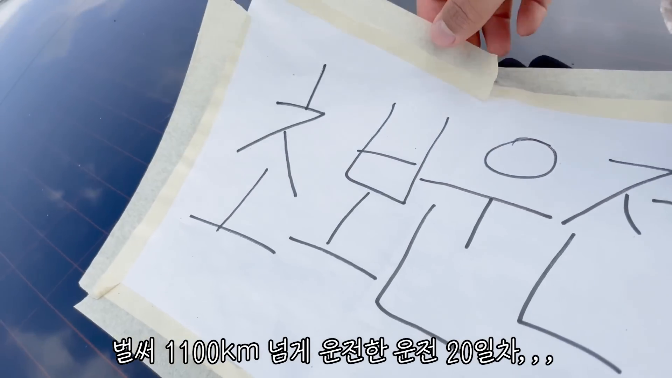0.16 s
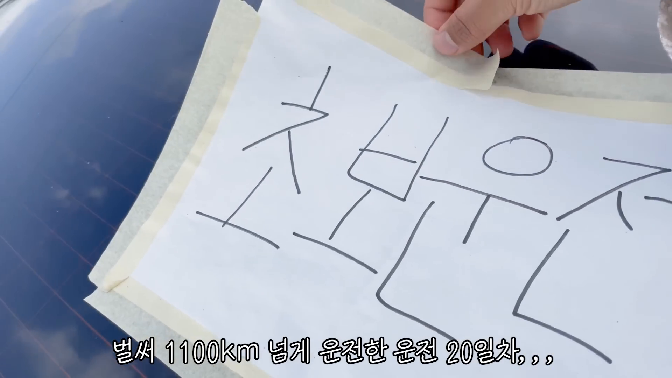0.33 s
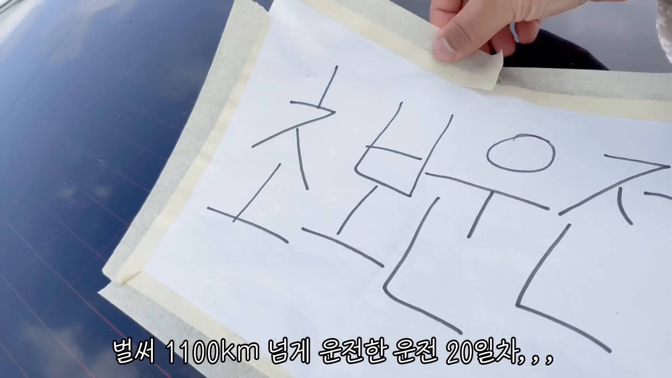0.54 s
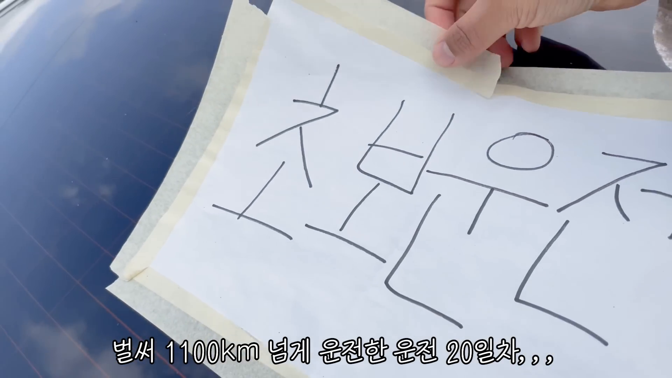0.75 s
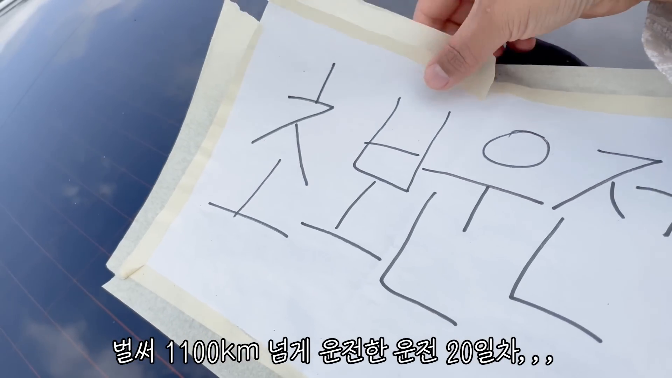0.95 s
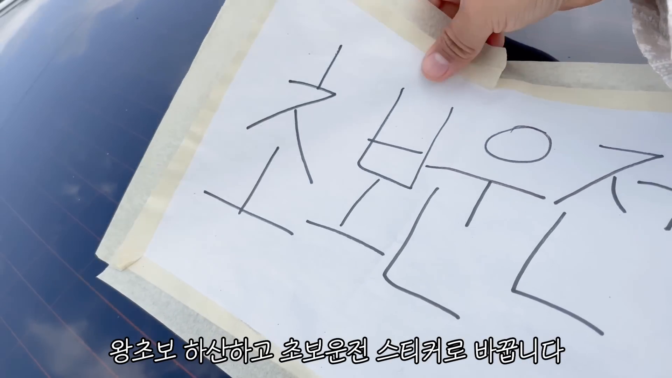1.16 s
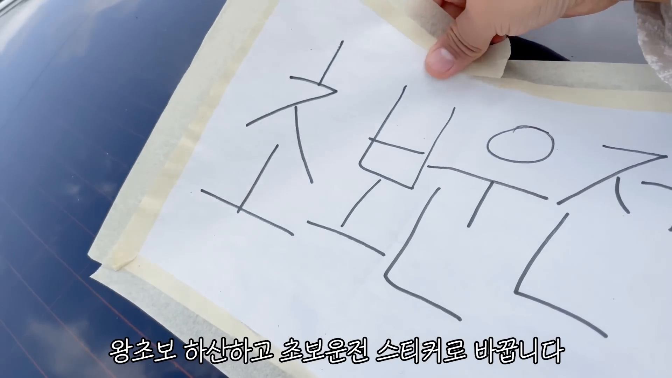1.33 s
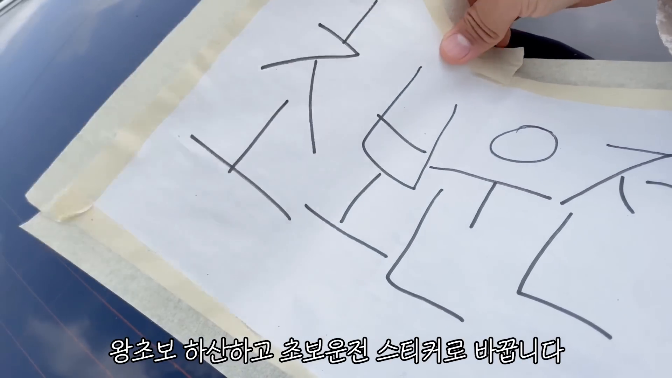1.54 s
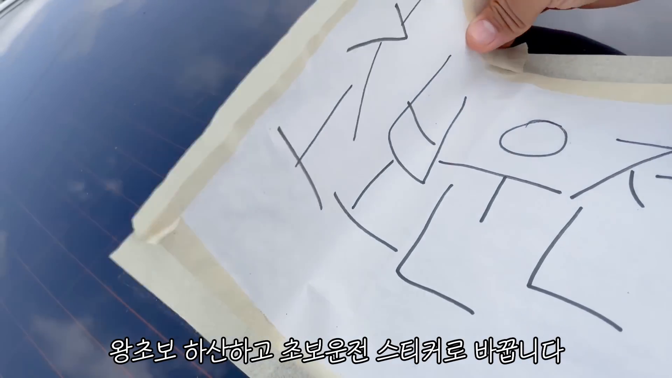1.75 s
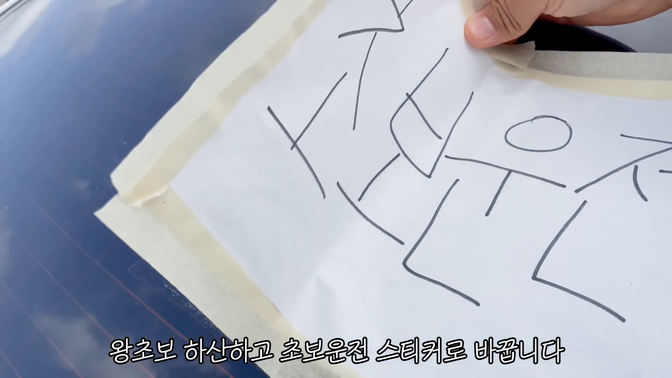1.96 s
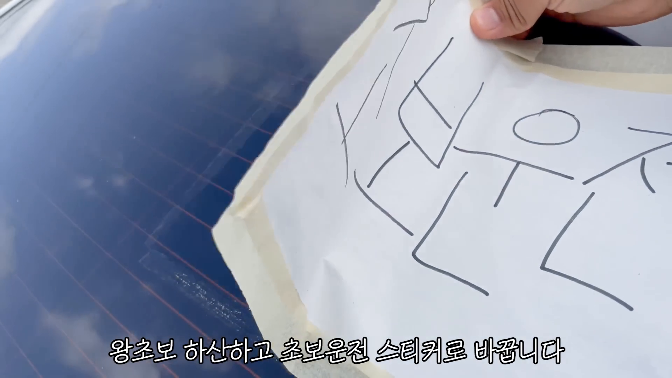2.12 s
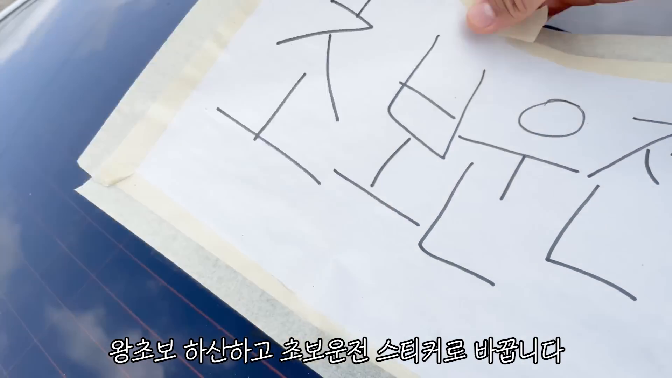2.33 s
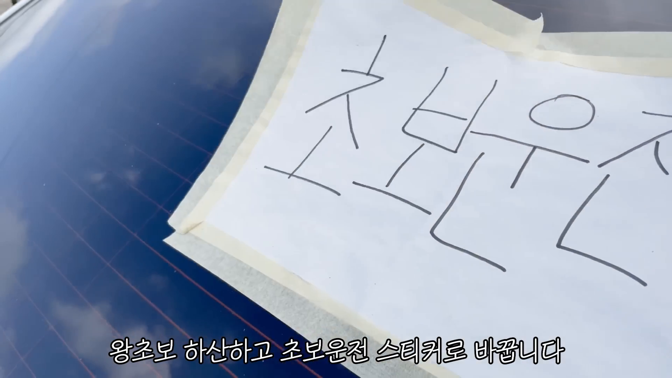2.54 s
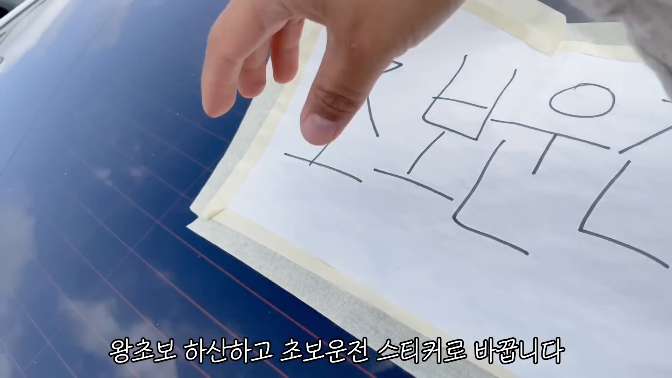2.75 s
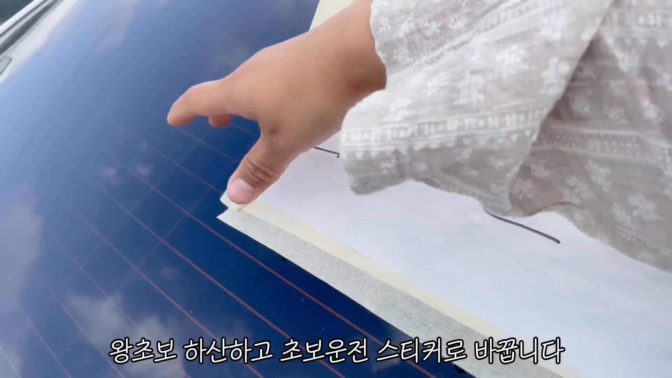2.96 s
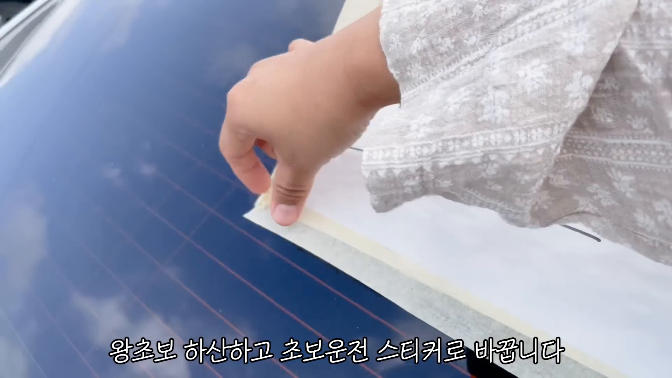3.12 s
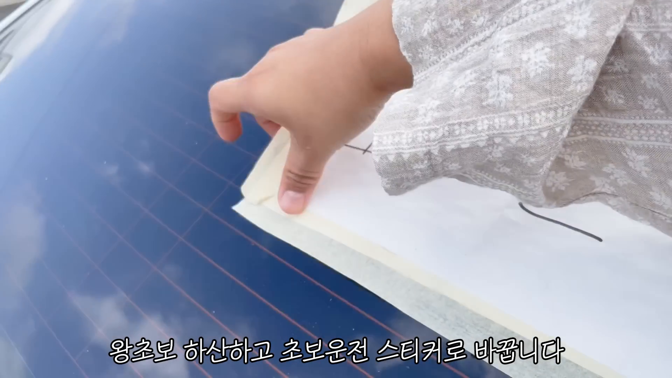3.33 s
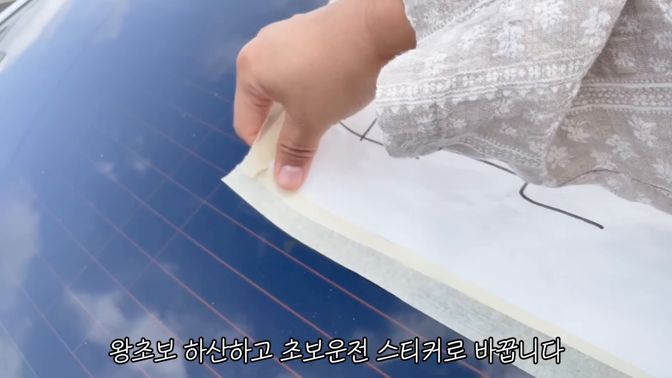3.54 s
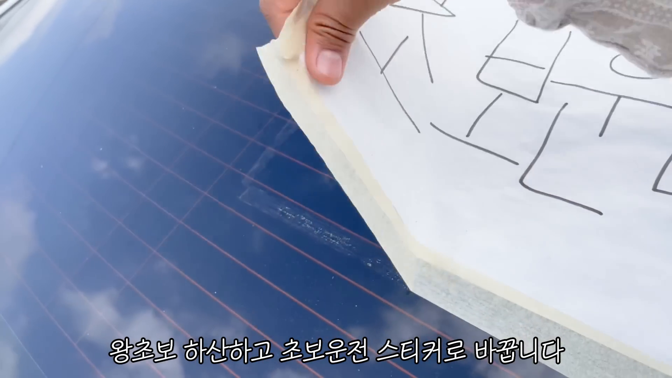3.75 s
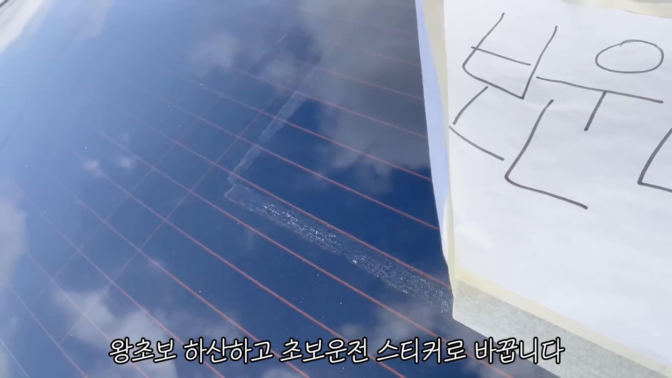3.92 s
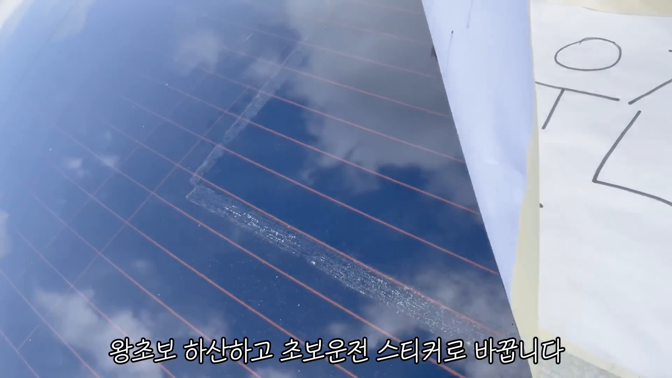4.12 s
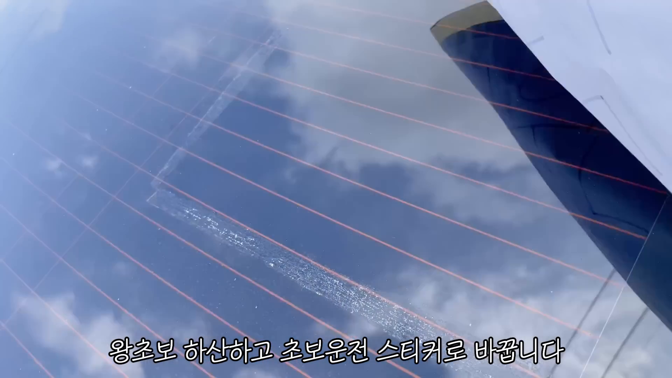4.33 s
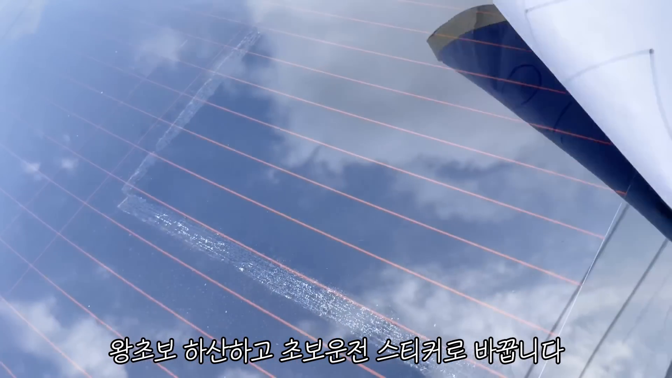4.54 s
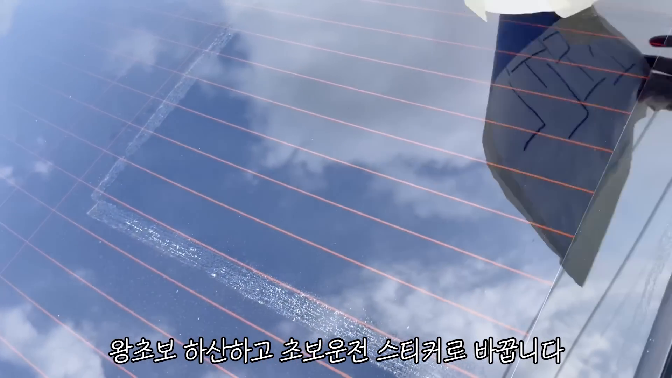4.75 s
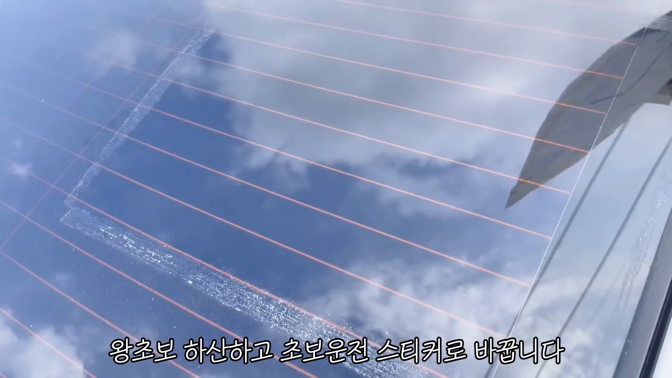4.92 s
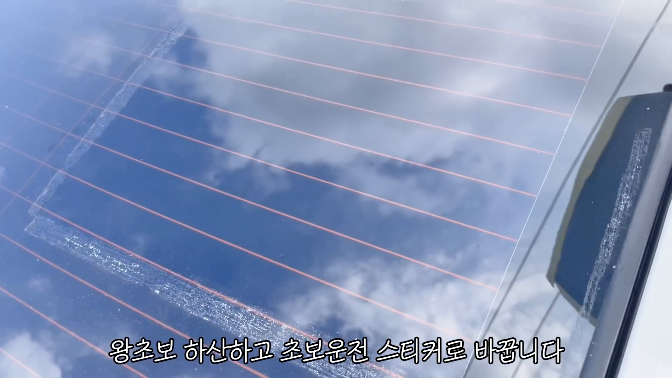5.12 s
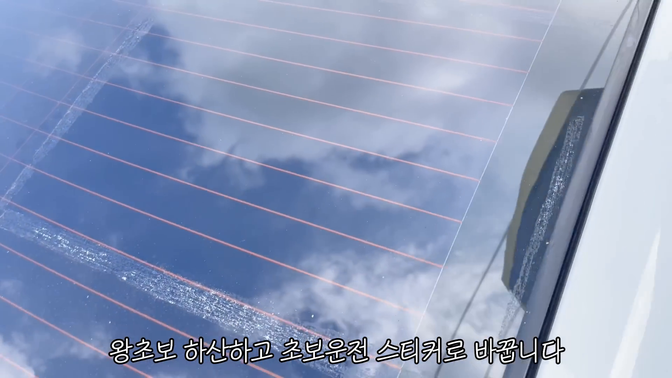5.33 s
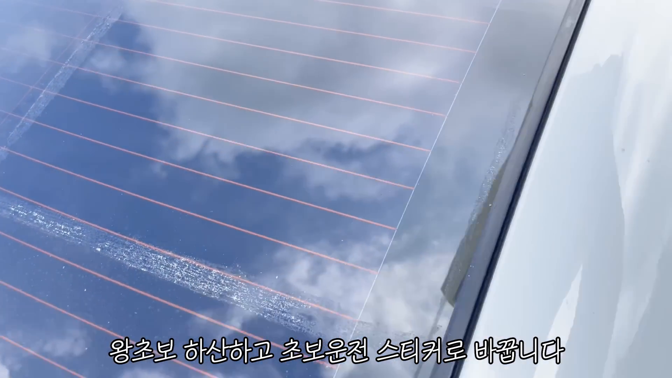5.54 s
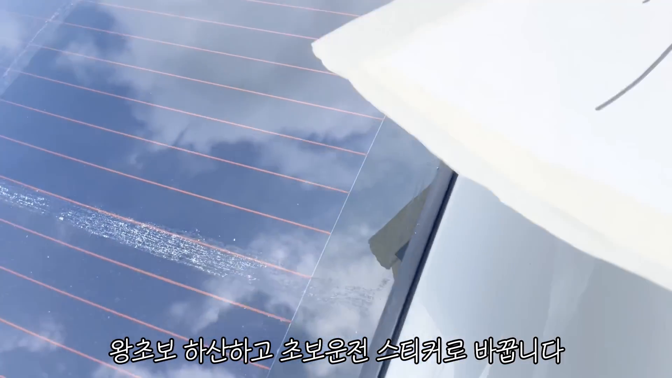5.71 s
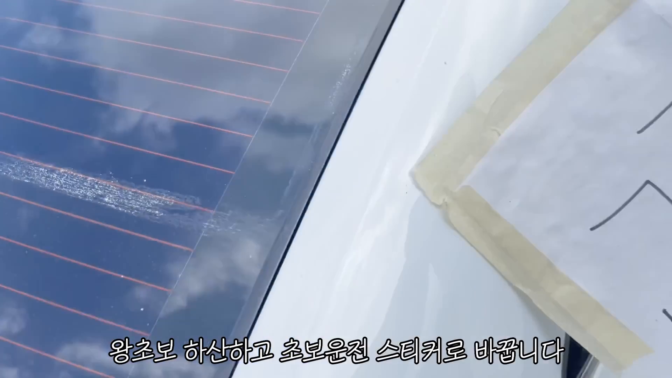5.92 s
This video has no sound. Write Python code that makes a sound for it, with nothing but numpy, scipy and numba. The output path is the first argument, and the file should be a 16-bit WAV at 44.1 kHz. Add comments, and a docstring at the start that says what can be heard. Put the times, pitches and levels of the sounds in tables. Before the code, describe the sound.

Close, dry stereo phone pickup outdoors, with a soft low rush of air. From 0.1 to 0.6 s a fingertip hisses faintly and evenly along paper tape. Around 1.1 s a thin, distant bird-like whistle sounds very faintly, dropping at its end, as the first small paper crackles begin. Between 1.3 and 2.5 s the stiff sheet bends with scattered sharp snaps, two short rips near 1.4 s and a tight cluster at 2.15 s, amid low buffeting. A deep soft flap thumps at 2.7 s. From 3.05 s peeling resumes, thickening after 3.4 s into gritty ticks; brighter, fizzy glue crackle fills 4.0 to 4.25 s, then hard cracks and rips peak around 4.5 s, with another strong snap at 4.93 s. The freed sheet makes a soft wide swish from 5 to 5.75 s with light flaps, ending in a brief crackle and snap near 6 s.

```python
"""A fingertip hisses along masking tape over the low rush of the open air; then a paper sign is pulled
off a car's rear window, close to a phone. The glue lets go in showers of ticks and short rips (noise bursts),
and the stiff sheet buckles with sharp snaps (noise cracks that ring on). Its flapping pushes soft thumps
of air at the microphone (short low tones). A swish, a rustle and a faint whistle complete the scene."""
import sys
import numpy as np
from scipy import signal
from scipy.fft import rfft, irfft, next_fast_len
from scipy.io import wavfile
from scipy.ndimage import uniform_filter1d, map_coordinates
from numba import njit

SR = 44100
rng = np.random.default_rng(int(sys.argv[2]) if len(sys.argv) > 2 else 0)


def generate_wav(sig):
    """Save sig (samples, or channels by samples) to the path in sys.argv[1] as 16-bit PCM at SR."""
    pcm = np.round(np.clip(np.atleast_2d(sig).T, -1, 1) * 32767).astype(np.int16)
    wavfile.write(sys.argv[1], SR, pcm)


N = 267819
T = np.arange(N) / SR  # time of every sample, in seconds

# The bright fizz of the paper's fibres. Each row: pitch in Hz, level in dB.
FIBRE_FIZZ = [(3000, -51), (8500, -7.5), (10000, 7), (11500, 11), (12800, 15), (14200, 5), (15800, -2),
              (17500, -41)]


def snaps(ring=0.45, ring_hz=2600, tail_s=0.01, tail=0.036, length_s=0.0022, lead_in_s=0.0032, size=3000):
    """A crease flips over or a glue thread breaks: a crack, its bounce, a low-pitched ring and a scattered tail."""
    # Sharp single snaps: the sheet buckles or, around 4.03 to 4.25 s, a glue thread breaks.
    # Each row: time in seconds, crack level in dB, body minus crack in dB, fizz minus crack in dB.
    snap_list = [(1.147, -33, -2.5, -14), (1.370, -23.5, 3.5, 8), (1.553, -34, 6, 3.5),
                 (1.6835, -21, 0.5, 3.5), (1.756, -35.5, 4.5, 10), (1.7646, -30, -7, 2),
                 (1.777, -28, -6.5, -8), (1.912, -34, 2, 6), (2.0256, -40, -16, 8.5),
                 (2.081, -45, 15.5, -12), (2.1536, -28.5, 9, 10), (2.1563, -22.5, 1.5, 4.5),
                 (2.1608, -20.5, -2.5, 0), (2.1709, -29, -2, 9), (2.2733, -31, 11, -14),
                 (2.288, -31.5, 1, -25), (2.3215, -21, 4.5, -13.5), (2.3295, -28, -3, -14),
                 (2.356, -40, 12, -28), (2.4092, -45, 18.5, -10), (2.4835, -27, 3.5, -10),
                 (3.078, -24.5, -3.5, -10), (3.1661, -27, -4.5, -6), (3.2969, -45.5, 19, -1),
                 (3.3133, -42, 15, -8), (3.447, -33, -0.5, -15), (3.4561, -20, 3, -7),
                 (3.4805, -32, 11, -25), (3.6565, -27, -1, -8), (3.6857, -27.5, -5, -22),
                 (3.743, -21.5, -8, -21), (3.7821, -18.5, -5, -11), (3.826, -28, -13, -1),
                 (3.8576, -26.5, 3, -6.5), (3.94, -29, -2, -6.5), (4.027, -30.5, -9, -8),
                 (4.043, -25.5, -22, -9), (4.0618, -31.5, -27, -7), (4.091, -32, -19, 4.5),
                 (4.098, -30.5, -14, 5), (4.1088, -31.5, -14, 3), (4.132, -32, -3, 0),
                 (4.1668, -27, -21, -1), (4.178, -25, -15, -1.5), (4.2066, -27, -7, 9),
                 (4.225, -40.5, -9, 13), (4.252, -28, -15, -5), (4.281, -30, 8, -28),
                 (4.3125, -36.5, -6, -20), (4.365, -27.5, -18, -20), (4.407, -40, -4, -16),
                 (4.4191, -24, -7.5, -10), (4.451, -27, -13, -11), (4.4947, -14, -4.5, -11),
                 (4.535, -32, -5, -21), (4.555, -24.5, -23, -12.5), (4.5954, -19.5, -11, -4.5),
                 (4.6271, -20, -5, -9), (4.701, -46, 13, -13), (4.727, -47.5, 13.5, -24),
                 (4.885, -30, -1.5, -3), (4.911, -37, -4, 10), (4.9307, -17, -1.5, -1),
                 (4.9762, -39, -1, -24), (5.0823, -42, -1, -1), (5.207, -43, 3, -22),
                 (5.326, -45.5, 6.5, -13), (5.423, -38, 3.5, -30), (5.5874, -43.5, 6, -28),
                 (5.8241, -37.5, 11, -18), (5.927, -36, 9, -22), (5.9934, -21.5, 3, -25)]
    lead_in = 0.055  # faint noise around the onset, against the crack
    rise_s, crack_s, ring_s = 0.00015, 0.0008, 0.003  # rise and fall of the crack, fading of the ring
    bounce = 0.25  # strength of the bounce off the glass, against the crack
    out = np.zeros((2, N))
    t = (np.arange(size) - size // 8) / SR  # zero at the snap
    damping = signal.butter(2, min(ring_hz, SR / 3), fs=SR)
    lags_s = rng.uniform(0.0025, 0.0029, len(snap_list))
    for (s, db, body_db, fizz_db), lag_s in zip(snap_list, lags_s):
        noise = rng.standard_normal((3, 2, size))
        crack = np.zeros(size)
        for share, since in [(1, t), (bounce, t - lag_s)]:
            crack += share * np.exp(-np.maximum(-since / rise_s, since / crack_s))
        ring_noise = ring * np.exp(-t / ring_s) * (t > 0) * noise[1]
        ringing = signal.lfilter(*damping, ring_noise)
        before = lead_in * np.exp(-np.abs(t) / lead_in_s)
        after = tail * np.exp(-t / tail_s)
        scatter = np.where(t > 0, after, before) * noise[2]
        push = crack * noise[0] + ringing + scatter
        add(out, s + t[0], sheet(push, length_s, db, body_db, fizz_db))
    return out


def rips(attack_s=0.0046, release_s=0.0063, size=4000):
    """A dense run of ticks that builds quickly and dies away quickly."""
    # A short burst of dense ticks: tape giving way or, in the first row, the fingertip touching down.
    # Each row: start in seconds, length in seconds, crack level in dB, body minus crack in dB,
    # fizz minus crack in dB.
    rip_list = [(0.061, 0.059, -55.5, 5, 6), (0.54, 0.024, -56.5, 4, 3), (1.007, 0.0055, -61.5, -4, 18),
                (1.162, 0.0062, -48.5, 17, -5), (1.302, 0.0092, -64, -7, 19.5),
                (1.373, 0.023, -27.5, 3.5, -3.5), (1.407, 0.023, -28, 2.5, -3.5),
                (2.14, 0.012, -49, 5, 5.5), (2.25, 0.01, -38.5, 9.5, -14), (3.062, 0.017, -44, 9.5, 6),
                (3.096, 0.02, -35.5, 1.5, -5), (4.263, 0.0083, -17.5, -8.5, -13),
                (4.4714, 0.011, -22.5, -3.5, -15.5), (5.863, 0.045, -42.5, 7, -12),
                (5.905, 0.017, -32.5, 7, -21)]
    out = np.zeros((2, N))
    t = np.arange(size) / SR
    for s, length_s, db, body_db, fizz_db in rip_list:
        release = np.exp(-np.maximum(t - length_s, 0) / release_s)
        envelope = np.minimum(t / attack_s, 1) * release
        grain = ticks(size, rate=900, spread_db=2, decay_s=0.0007, hiss=0.4)
        add(out, s, sheet(envelope * grain, length_s, db, body_db, fizz_db))
    return out


def peel():
    """Each pull takes hold, swells as the tape tightens and lets go; fine fibres tick between coarser glue threads."""
    # The hand pulls and the tape peels. Each row: start in seconds, length in seconds,
    # crack level in dB, fizz minus crack in dB.
    pull_list = [(0.742, 0.087, -62, -3.5), (1.201, 0.037, -66.5, 8), (1.622, 0.025, -47, -2),
                 (2.168, 0.13, -47.5, -8), (2.325, 0.092, -53.5, -15), (3.038, 0.081, -48, -7),
                 (3.136, 0.027, -43, -6), (3.276, 0.052, -45.5, -10.5), (3.388, 0.13, -48, -12),
                 (3.79, 0.13, -43, -2.5), (3.933, 0.11, -48.5, -5.5), (4.033, 0.15, -41, -2.5),
                 (4.148, .1, -39, -5), (4.299, 0.17, -51, -14.5), (4.487, 0.077, -36.5, -10.5),
                 (4.578, 0.075, -40.5, -10), (4.738, 0.029, -47.5, -2), (4.811, 0.053, -44, 0.5),
                 (4.858, 0.11, -36.5, -7), (5.796, 0.045, -42, -7), (5.846, 0.163, -53.5, -15)]
    attack_s, swell_db, release_s = 0.01, 3.5, 0.012
    # the fizzier a pull, the less it sounds the sheet's body
    plain_body_db, body_lost_per_fizz = -3.5, 0.91  # dB without fizz, dB lost per dB of fizz
    tearing, fibre_tearing = 0.78, 0.84  # shares that are breaking threads, the rest being rubbing
    fibre_db = -0.5  # finest fibres, which snap on their own, against the fizz
    out = np.zeros((2, N))
    t = T[:SR // 5]
    for s, length_s, db, fizz_db in pull_list:
        swell = undb(swell_db * (np.minimum(t / length_s, 1) - 1))
        release = np.exp(-np.maximum(t - length_s, 0) / release_s)
        envelope = np.minimum(t / attack_s, 1) * swell * release
        body_db = plain_body_db - body_lost_per_fizz * fizz_db
        threads = registers(rub(len(t), tearing), body_db, fizz_db)
        fibres = undb(fizz_db + fibre_db) * colour(rub(len(t), fibre_tearing), FIBRE_FIZZ)
        add(out, s, undb(db) * envelope * (threads + fibres))
    return out


def flaps(flutter=0.38, flutter_s=0.026, size=6000):
    """The loose sheet swings once hard and flutters unevenly around the same pitch."""
    # The sheet flaps, knocks on the glass, or the hand lands on it.
    # Each row: time of the middle in seconds, level of the swing in dB, pitch in Hz.
    flap_list = [(1.32, -25, 98), (1.397, -18, 214), (2.64, -16, 104), (2.681, -11.5, 77.6),
                 (2.72, -16, 105), (3.052, -19.5, 95.5), (3.317, -17.5, 194), (3.99, -24.5, 125),
                 (4.106, -23, 207), (4.171, -25, 236), (4.2, -22, 414), (4.205, -24.5, 157),
                 (4.797, -27.5, 182), (5.012, -31, 312), (5.19, -23.5, 363), (5.443, -29, 270),
                 (5.5, -22, 100)]
    ring_cycles, ring_s = 0.42, 0.0028  # a flap rings for a share of its period plus a fixed time
    out = np.zeros((2, N))
    t = (np.arange(size) - size // 2) / SR
    turns = rng.random((len(flap_list), 2, 1))  # where in its cycle each channel is
    for (s, db, hz), turn in zip(flap_list, turns):
        swing = np.sin(2 * np.pi * (hz * t + turn)) / np.cosh(t / (ring_cycles / hz + ring_s))
        bending = signal.butter(4, [hz / 2, hz + 140], "bandpass", fs=SR, output="sos")
        shiver = unit(signal.sosfilt(bending, rng.standard_normal((2, size))))
        shiver = shiver * np.hanning(size) / np.cosh(t / flutter_s)
        add(out, s + t[0], undb(db) * (swing + flutter * shiver))
    return out


def slide():
    """Skin on crepe paper: a fine, even hiss that reaches the right port late."""
    # A fingertip slides along the tape. Each row: time in seconds, level in dB.
    slide_level = [(.06, -59.5), (.09, -49), (.42, -45.5), (.52, -58.5), (.6, -116)]
    # The hiss of the skin. Each row: pitch in Hz, level in dB.
    finger_spectrum = [(1500, 5.5), (3000, 4.5), (5200, 3), (6500, 5), (7600, -2), (10500, 2.5),
                       (13000, -8), (16000, -46)]
    lag_s = 0.0001464
    hiss = undb(curves(slide_level)[0]) * colour(rng.standard_normal(N), finger_spectrum)
    late = map_coordinates(hiss, [(T - lag_s) * SR])
    return np.array([hiss, late])


def swish(fade_s=0.029):
    """The freed sheet is swung past the phone: a soft, wide hush that meets the two ports in opposite phase."""
    # The swing: start in seconds, length in seconds, level in dB.
    sheet_swing = (4.98, 0.77, -46.5)
    # The hush. Each row: pitch in Hz, level in dB.
    swish_spectrum = [(150, 13), (400, 1), (750, 11), (1600, 1), (3000, -15), (8000, -42)]
    s, length_s, db = sheet_swing
    envelope = np.clip(np.minimum(T - s, s + length_s - T) / fade_s, 0, 1)
    hush = envelope * undb(db) * colour(rng.standard_normal(N), swish_spectrum)
    return np.array([hush, -hush])


def rustle(body_db=4, fizz_db=-3, hiss=1.35, waver_db=4.0):
    """The held sheet never lies quite still: a faint hiss with light ticks."""
    # The handled paper. Each row: time in seconds, level in dB before it wavers.
    rustle_level = [(.9, -72.5), (1, -64.5), (2.9, -67), (3.22, -57.5), (3.7, -57.5), (5.1, -66)]
    grain = ticks(N, rate=200, spread_db=6, decay_s=0.0008, hiss=hiss)
    level_db = curves(rustle_level)[0] + waver_db * walk(13.4)
    return undb(level_db) * registers(grain, body_db, fizz_db)


def whistle():
    """A thin, faint, wavering note, like a far bird's, that holds its pitch and then drops."""
    # The note: start in seconds, length in seconds, pitch in Hz, fall at the end in Hz,
    # level in dB before it wavers.
    whistle_note = (1.06, .21, 4400, 650, -65.5)
    s, length_s, hz, fall_hz, db = whistle_note
    along = np.clip((T - s) / length_s, 0, 1)  # 0 at the start, 1 at the end
    tone = np.sin(2 * np.pi * np.cumsum(hz - fall_hz * along ** 6) / SR)
    envelope = np.sqrt(np.abs(np.sin(np.pi * along)))
    return undb(db + 4 * walk(60)) * envelope * tone


def air(gust_db=2):
    """Low buffeting near the phone, the uneven drumming of the bending paper, and the open air: coloured noise."""
    # Air moved by the sheet and the arm. Each row: time in seconds, buffeting in dB,
    # drumming of the paper in dB, both before the gusts.
    moved_air = [(0.0, -46.5, -51.5), (0.91, -52, -49.5), (1.57, -42, -39), (2.03, -29, -38.5),
                 (2.43, -43, -37.5), (2.91, -32, -35.5), (3.2, -38, -37.5), (3.69, -71, -33.5),
                 (4.04, -38.5, -34), (4.29, -36, -44.5), (4.5, -40.5, -45.5), (5.06, -36.5, -38),
                 (5.43, -41, -48), (5.63, -48, -51.5), (6.07, -52.5, -56.5)]
    # The rush of the open air. Each row: time in seconds, level in dB.
    outdoor_level = [(0, -49), (2.1, -44), (4.1, -43), (5.1, -58), (6.07, -53)]
    # Colour of the buffeting. Each row: pitch in Hz, level in dB.
    buffet_spectrum = [(15, -37), (35, -5), (70, 4.5), (110, -0.5), (160, -7), (300, -58), (1000, -64)]
    # Colour of the drumming. Each row: pitch in Hz, level in dB.
    drum_spectrum = [(60, -10), (130, -5), (180, 2.5), (245, 2.5), (330, -8), (480, -16), (1400, -82)]
    # Colour of the open air. Each row: pitch in Hz, level in dB.
    rush_spectrum = [(100, 0.5), (280, 11), (560, 8.5), (850, 9), (1250, 2), (2000, -10), (8500, -38.5)]
    buffet_db, drum_db = curves(moved_air)
    layers = [(buffet_db + gust_db * walk(26), buffet_spectrum),
              (drum_db + gust_db * walk(100), drum_spectrum),
              (curves(outdoor_level)[0], rush_spectrum)]
    return sum(undb(db) * colour(rng.standard_normal((2, N)), spectrum) for db, spectrum in layers)


def sheet(push, length_s, db, body_db, fizz_db):
    """One push on one patch of paper, with the given levels over length_s."""
    spread = np.sqrt(length_s * SR / push.shape[1])
    return registers(facet(push), body_db, fizz_db) * undb(db) * spread


def registers(push, body_db, fizz_db, edge_db=-0.5, edge_share=0.79):
    """A push sounds the sheet's hollow body, its crack and its fibres' fizz; fizzy pushes have a harder edge."""
    # The hollow body. Each row: pitch in Hz, level in dB.
    body_spectrum = [(150, -11), (450, -2.5), (800, -1.5), (1400, -3), (1700, -15), (2300, -21.5),
                     (5000, -104)]
    # The crack. Each row: pitch in Hz, level in dB.
    crack_spectrum = [(600, -38), (1400, 0), (1900, 4.5), (3200, 7), (4300, 3), (5700, -4), (8400, -29),
                      (12000, -48)]
    # The hard edge. Each row: pitch in Hz, level in dB.
    edge_spectrum = [(2000, -16.5), (4000, 4), (5200, 2), (6900, 1.5), (8400, -14.5), (12000, -35.5)]
    layers = [(body_db, body_spectrum), (0, crack_spectrum),
              (edge_db + edge_share * fizz_db, edge_spectrum), (fizz_db, FIBRE_FIZZ)]
    return sum(undb(db) * colour(push, spectrum) for db, spectrum in layers)


def facet(push, patchy_db=3):
    """Each patch of paper favours some pitches and swallows others, by chance."""
    hz = np.geomspace(400, 16000, 48)
    favour_db = patchy_db * rng.standard_normal(len(hz))
    return colour(push, np.transpose([hz, favour_db]))


def ticks(size, rate, spread_db, decay_s, hiss):
    """Glue threads break at random (rate a second): uneven, quickly dying bursts of noise over a fine hiss."""
    when = rng.random(size)
    strength = np.minimum(rng.standard_exponential(size), 3.5)
    energy = (when < rate / SR) * undb(spread_db * strength) ** 2
    energy = signal.lfilter([1], [1, -np.exp(-2 / (decay_s * SR))], energy)
    # a steady pull frees about the same energy in each stretch of time
    energy /= np.abs(uniform_filter1d(energy, size=2600)) + 1e-9
    return np.sqrt(energy + hiss ** 2) * rng.standard_normal((2, size))


def rub(count, tearing, size=1024):
    """Paper rubs and a share of glue threads break, moving from one patch of paper to the next."""
    tearing = np.clip(tearing, 0, 1)
    threads = ticks(count + 2 * size, rate=430, spread_db=5.5, decay_s=0.0007, hiss=0)
    rubbing = rng.standard_normal(threads.shape)
    friction = np.sqrt(tearing) * threads + np.sqrt(1 - tearing) * rubbing
    push = np.zeros(threads.shape)
    for i in range(0, count + size, size // 2):  # patches overlap by half
        patch = friction[:, i:i + size] * np.hanning(size)
        push[:, i:i + size] += facet(patch) * patch.std()
    return push[:, size:size + count]


def hollow(paper, q=5, boost=0.72):
    """The curved sheet favours one note, which moves with its bend."""
    # The hollow note as the sheet is bent and freed. Each row: time in seconds, pitch in Hz.
    hollow_note = [(2.3, 1103), (3.45, 910), (4.93, 1550), (5.83, 1400), (5.92, 1130)]
    hz = curves(hollow_note)[0]
    return paper + boost * np.array([resonate(x + 1e-18, hz, float(q)) for x in paper])


@njit
def resonate(x, hz, q):
    """Band-pass whose centre moves, gain 1 at the centre."""
    y = np.empty(len(x))
    band, low = 0., 0.  # the filter's two memories
    for i in range(len(x)):
        g = np.tan(np.pi * hz[i] / SR)
        v = (band + g * (x[i] - low)) / (1 + g * (g + 1 / q))
        band = 2 * v - band
        low += 2 * g * v
        y[i] = v / q
    return y


def ports(sound):
    """Direct sound reaches the two microphone ports out of step; scattered sound adds to their difference."""
    # How wide it sounds. Each row: pitch in Hz, side minus mid in dB.
    port_width = [(60, -9), (200, -11), (380, -4), (650, 2), (1200, -4), (2400, -2), (4600, -4.5),
                  (7000, 1), (8500, 14), (10500, 4), (13000, -12.5)]
    # Share of the side that leads on the left. Each row: pitch in Hz, share (held within -1 to 1).
    port_lead = [(300, -0.0087), (900, -0.16), (3000, -1.3), (5500, 0.73), (10000, 0.99)]
    size = next_fast_len(N // 2 + 1) * 2
    direct, scattered = rfft(sound, size)
    lead = np.clip(across(port_lead, size), -1, 1)
    difference = 1j * lead * direct + np.sqrt(1 - lead ** 2) * scattered
    side = irfft(undb(across(port_width, size)) * difference)[:N]
    return np.array([sound[0] + side, sound[0] - side])


def place(sound):
    """The further left the paper is, the more each pitch leans to one of the ports."""
    # Where the paper sounds from. Each row: time in seconds, place from 0 (ahead) to 1 (left).
    paper_place = [(1.4, 0.76), (3.4, 0.96), (3.9, .05), (4.5, 0.35), (5.9, 0.089)]
    # Lean of paper at the far left. Each row: pitch in Hz, left minus right in dB.
    port_lean = [(200, -2), (400, -10), (750, 22), (1300, -1.5), (2400, 6), (4400, 7.5), (8000, -0.3)]
    size = next_fast_len(N // 2 + 1) * 2
    aside = curves(paper_place)[0]
    mid = (sound[0] + sound[1]) / 2
    side = (sound[0] - sound[1]) / 2
    ratio = undb(across(port_lean, size))
    lean = irfft(rfft(mid, size) * (ratio - 1) / (ratio + 1))[:N]
    side = side + aside * lean
    return np.array([mid + side, mid - side])


def undb(db):
    """Decibels to gain."""
    return 10 ** (np.asarray(db) / 20)


def unit(x):
    """Scale each channel to rms 1 (the same average strength)."""
    return x / np.sqrt(np.mean(x ** 2, axis=-1, keepdims=True) + 1e-18)


def curves(table):
    """The columns of a time table, one value a sample."""
    s, *columns = np.transpose(table)
    return [np.interp(T, s, c) for c in columns]


def walk(rate_hz):
    """A slow random curve with spread 1: noise smoothed twice."""
    size = max(int(SR / rate_hz), 2)
    smooth = uniform_filter1d(rng.standard_normal(N), size)
    return unit(uniform_filter1d(smooth, size))


def across(points, size):
    """Read (Hz, value) points at the bins of a transform."""
    hz, value = np.transpose(points)
    bins_hz = np.arange(size // 2 + 1) * SR / size
    return np.interp(np.log(bins_hz + 1), np.log(hz), value)


def colour(x, points):
    """Filter to the given spectrum without sounding ahead of time; rms 1 out."""
    size = next_fast_len(x.shape[-1] // 2 + 1) * 2
    # folding the cepstrum makes the filter respond only after its input
    cepstrum = irfft(np.log(undb(across(points, size))))
    cepstrum[1:size // 2] *= 2
    cepstrum[size // 2 + 1:] = 0
    response = np.exp(rfft(cepstrum))
    return unit(irfft(rfft(x, size) * response)[..., :x.shape[-1]])


def add(out, s, x):
    """Mix a short sound in at time s, in seconds."""
    i = int(s * SR)
    out[:, i:i + x.shape[1]] += x[:, :N - i]


def scene():
    """The paper sounds from where the hand works; the air is all around."""
    paper = hollow(snaps() + rips() + peel() + rustle())
    around = flaps() + air() + whistle()
    return place(ports(paper)) + ports(around) + slide() + swish()


def record(dry):
    """The phone rounds the highest peaks and cuts the top."""
    ceiling, top_hz = 0.85, 16300
    rounded = ceiling * np.tanh(dry / ceiling)
    top_cut = signal.ellip(8, 0.2, 70, top_hz, fs=SR, output="sos")
    return signal.sosfilt(top_cut, rounded)


dry = scene()
out = record(dry)
generate_wav(out)
```